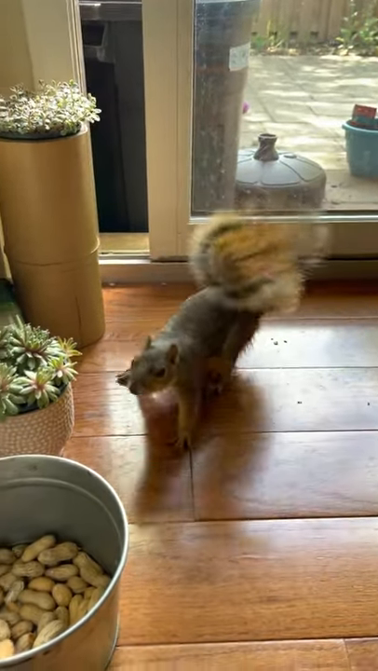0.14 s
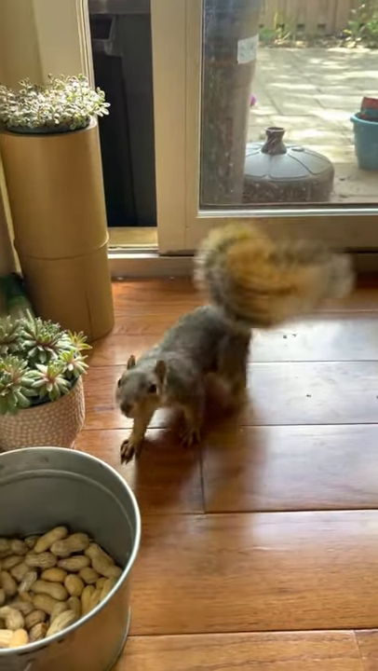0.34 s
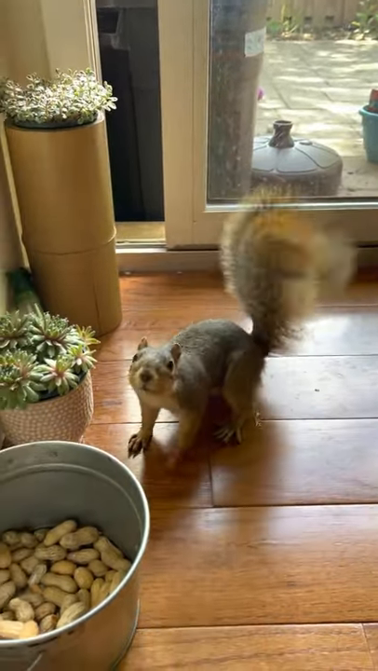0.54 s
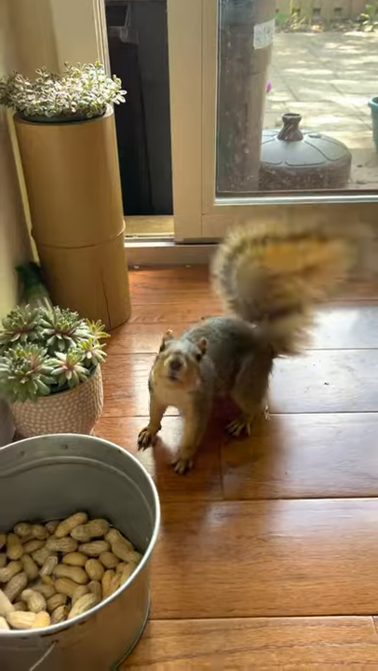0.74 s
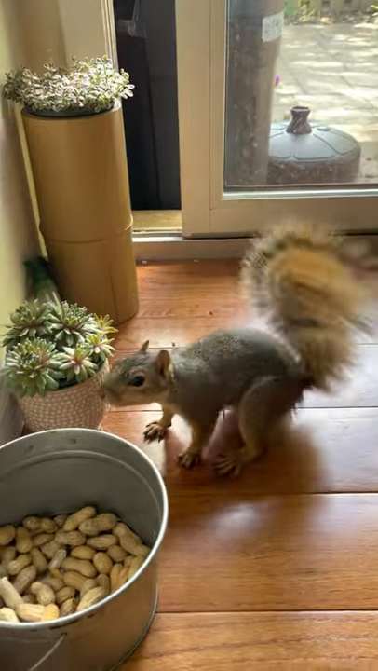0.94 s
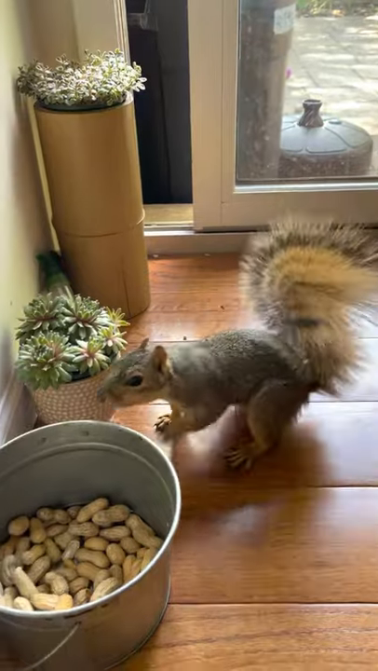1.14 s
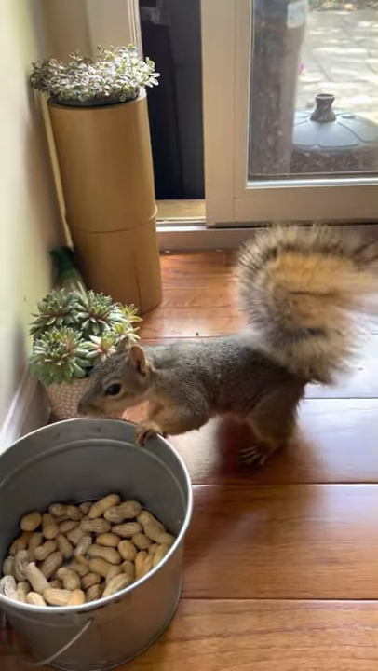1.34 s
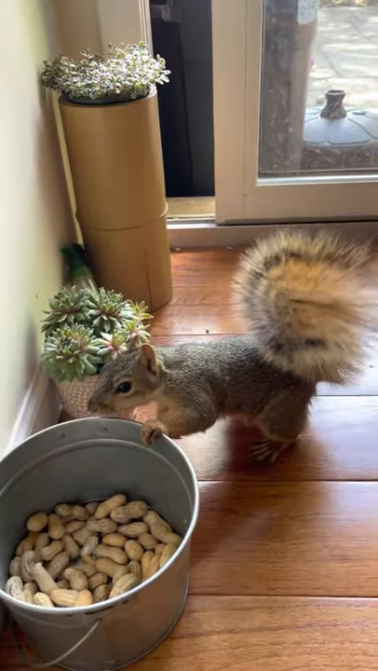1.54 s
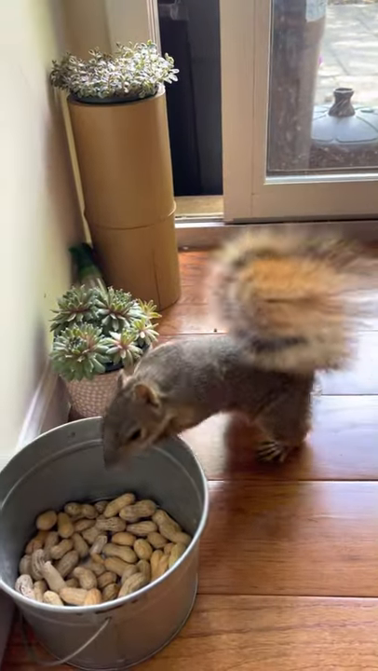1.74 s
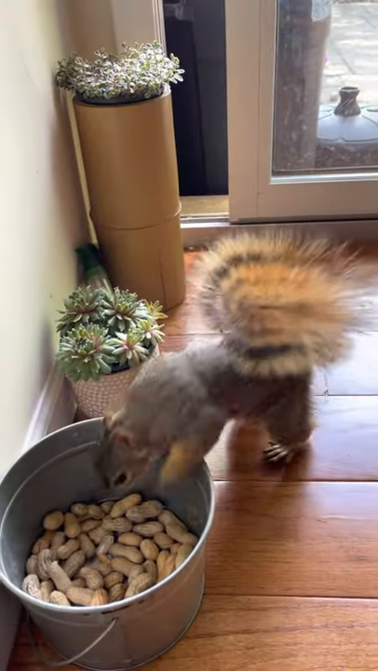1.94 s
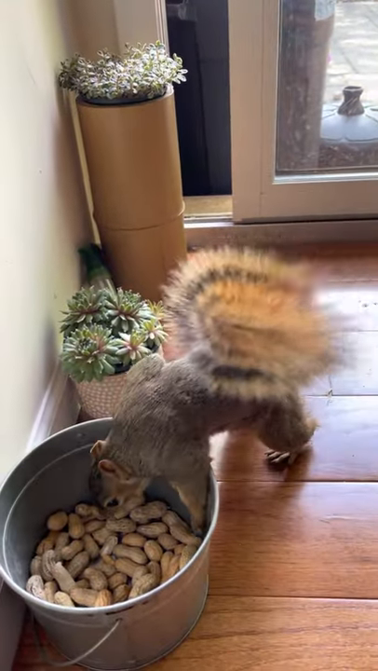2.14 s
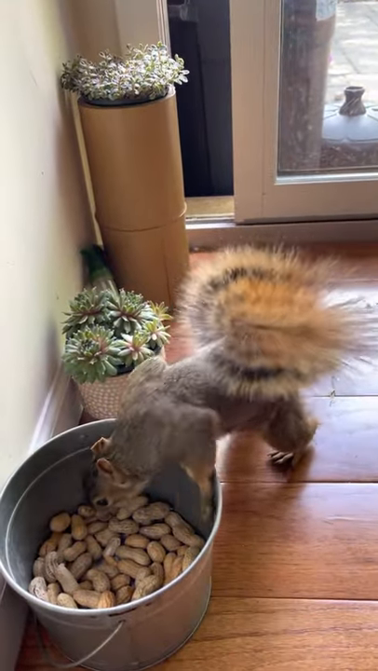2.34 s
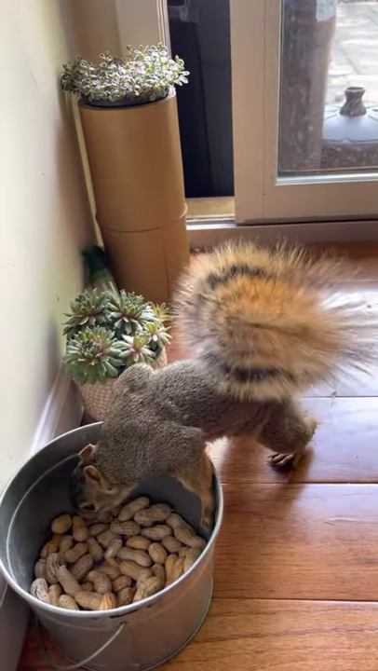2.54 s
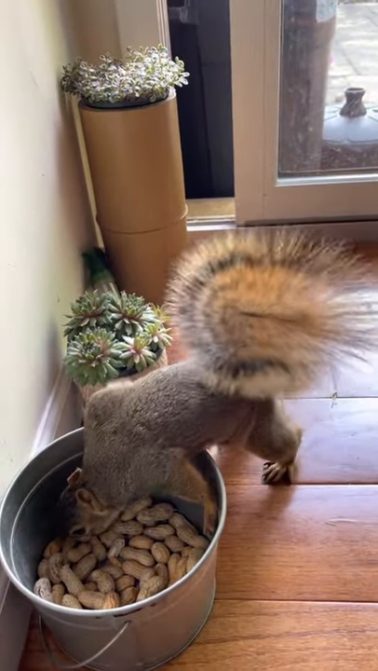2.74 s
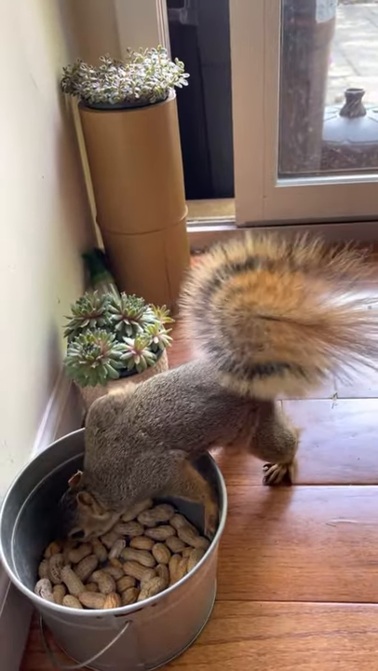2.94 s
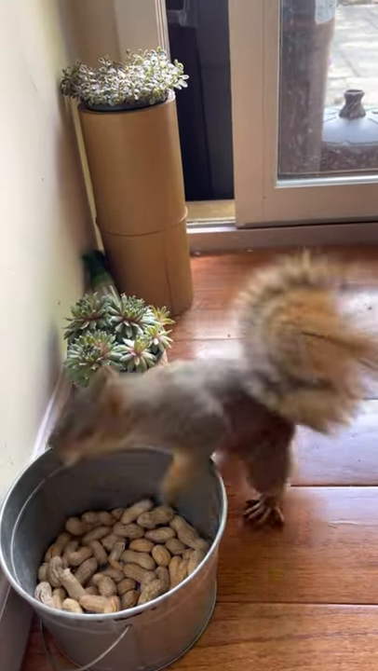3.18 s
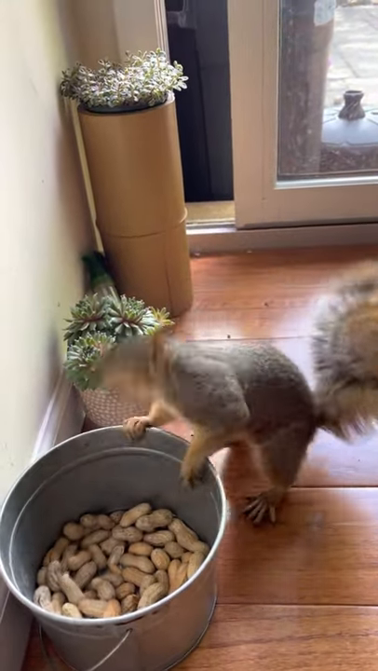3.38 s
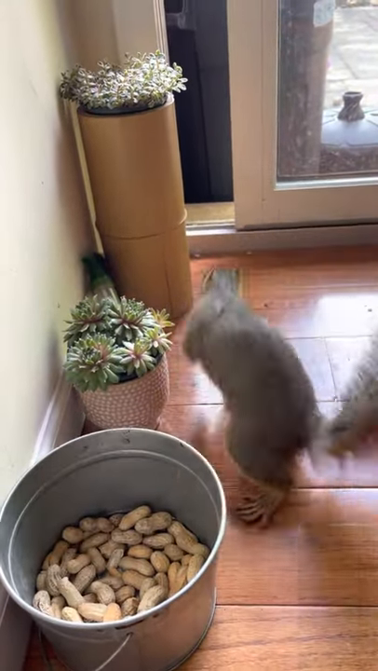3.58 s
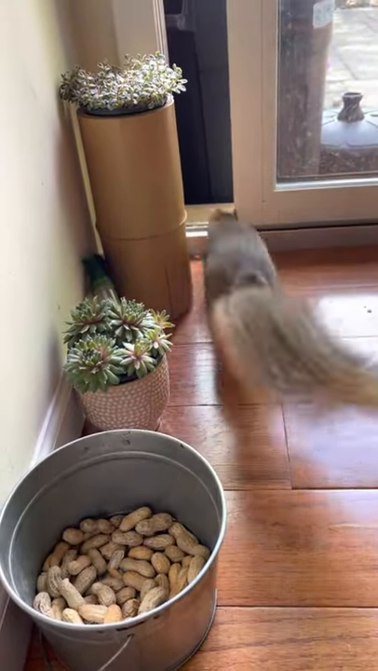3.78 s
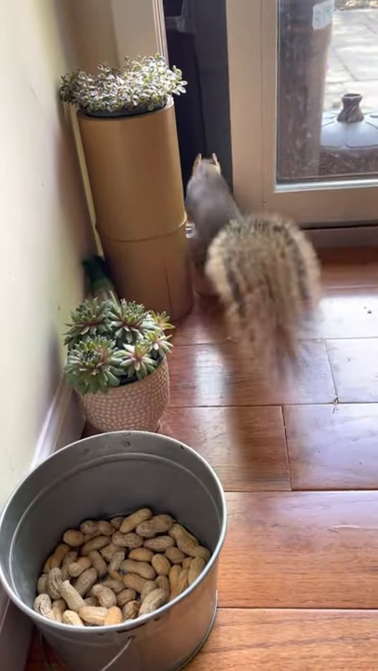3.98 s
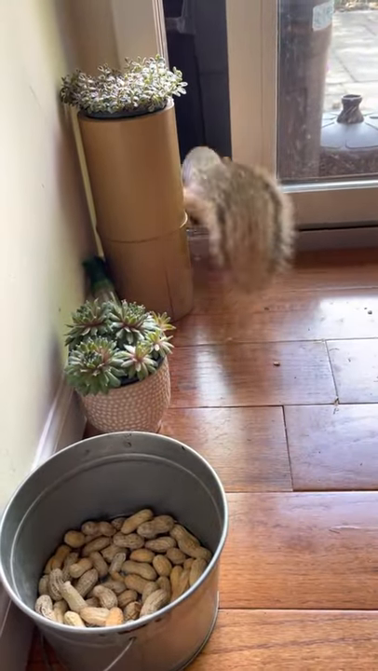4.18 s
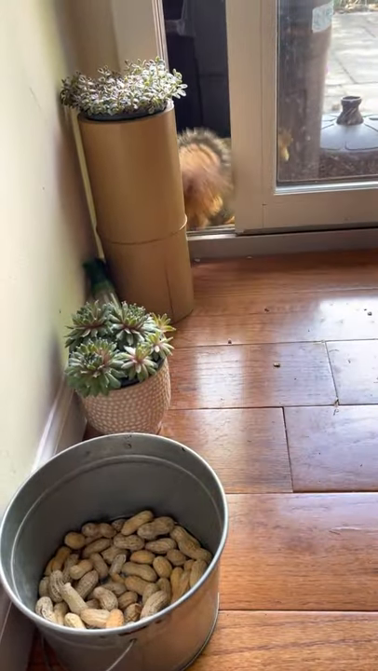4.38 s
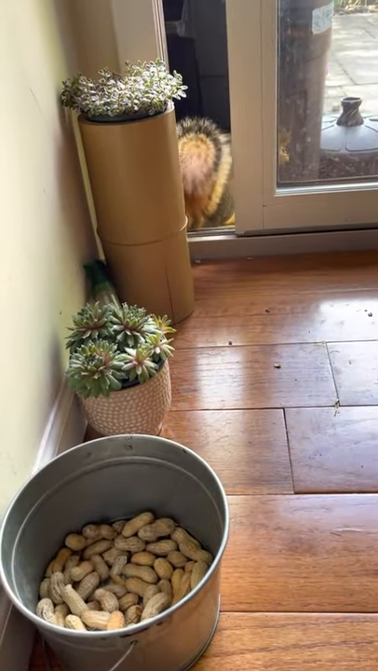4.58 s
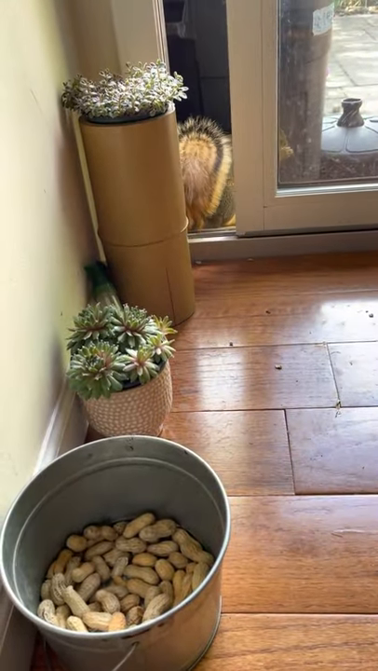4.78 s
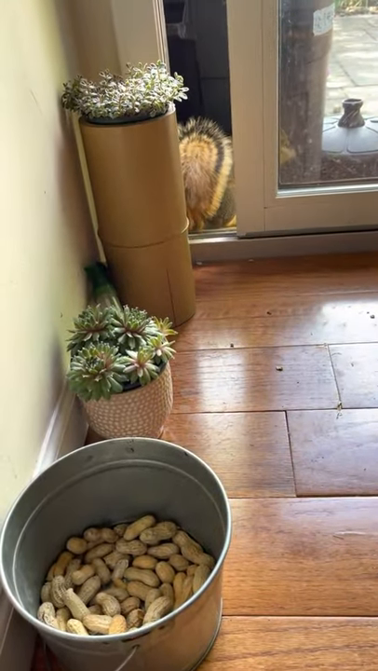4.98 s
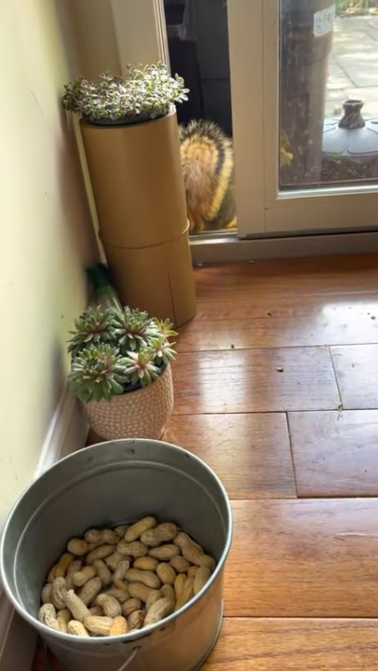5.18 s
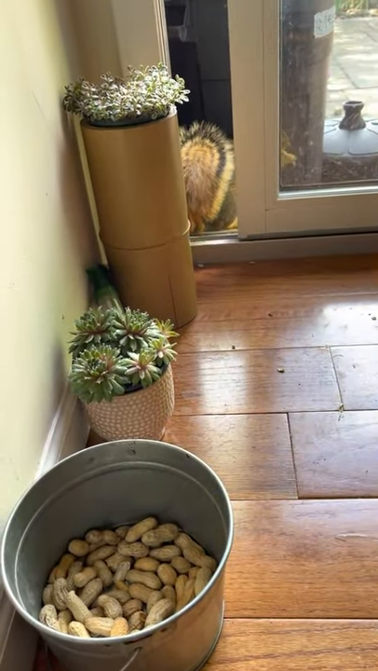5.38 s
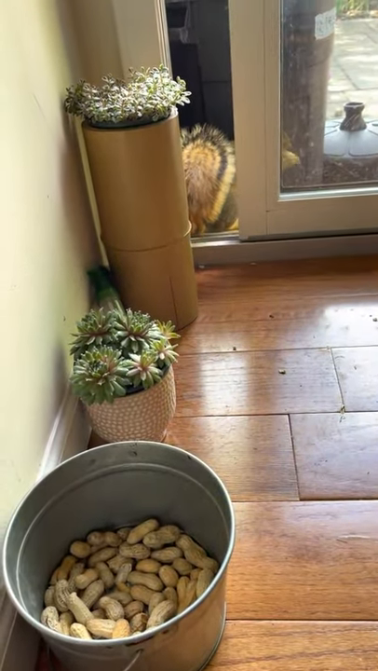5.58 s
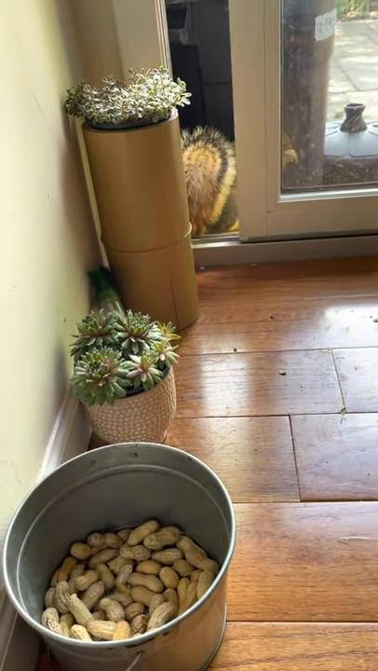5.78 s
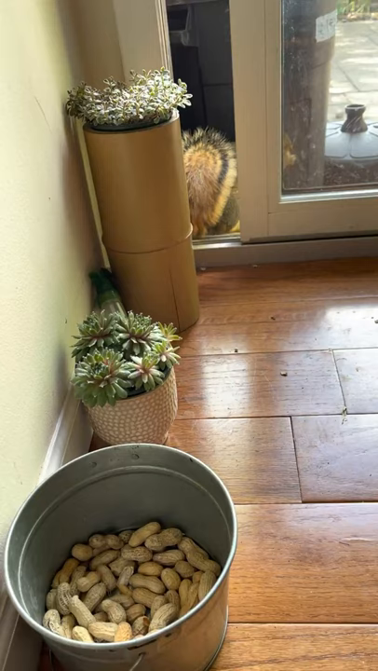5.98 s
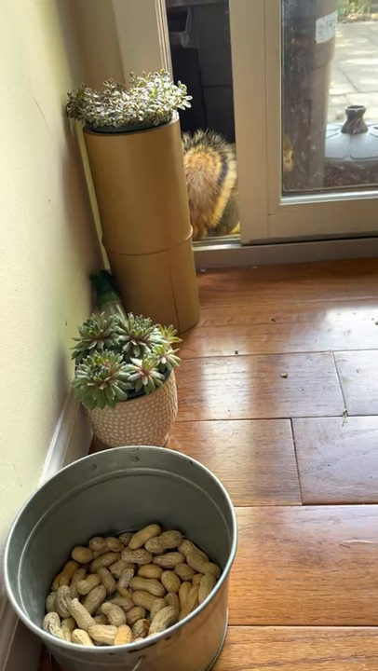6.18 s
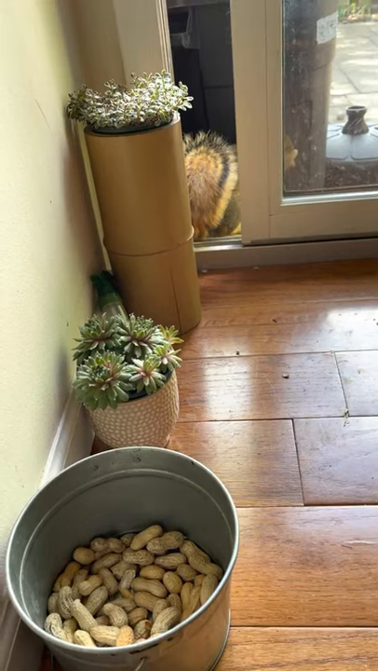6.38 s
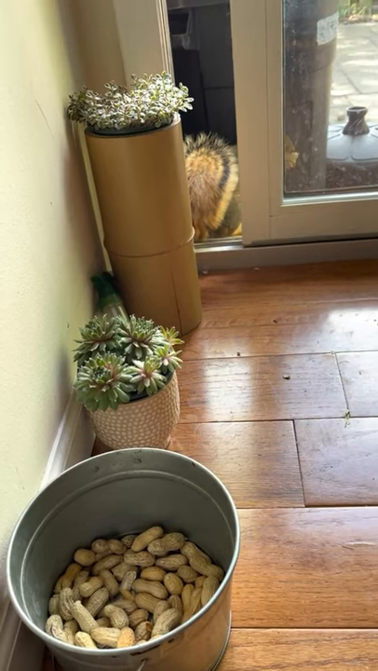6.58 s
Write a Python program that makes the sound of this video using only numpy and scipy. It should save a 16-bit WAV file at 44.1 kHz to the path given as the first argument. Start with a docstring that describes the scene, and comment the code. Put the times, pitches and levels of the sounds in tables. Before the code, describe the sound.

A squirrel pads across a hardwood floor with light claw clicks, then climbs a metal pail with a brief clank and scrape. Peanut shells rustle and crack as it rummages, and the pail's base knocks hollowly three times on the floor. The paws scamper away, leaving a faint appliance hum and very faint distant birds. Heard close up, in stereo, in a small room.

```python
"""A squirrel, close by in a small room, crosses a hardwood floor, climbs a metal pail and rummages
in the peanuts inside. Dry shells tick and scrape, the wall of the pail rings, and its base knocks three
times under the shifting weight; then the claws scamper off over the door sill. Behind it an appliance
hums faintly and far birds come in through the open door. Heard in stereo from two microphone ports."""
import sys
import numpy as np
from scipy import signal
from scipy.fft import rfft, irfft
from scipy.io import wavfile
from scipy.ndimage import uniform_filter1d

SR = 44100
rng = np.random.default_rng(int(sys.argv[2]) if len(sys.argv) > 2 else 0)


def to_wav(sig):
    """Store sig (one row per channel, or 1-D mono) as 16-bit WAV at the path in sys.argv[1].

    Samples outside -1..1 are clipped; the rate is SR.
    """
    pcm = np.clip(np.atleast_2d(sig), -1, 1) * 32767
    pcm = np.round(pcm).astype(np.int16)
    wavfile.write(sys.argv[1], SR, pcm.T)  # frames by channels


N = 291942
T = np.arange(N) / SR
HIT_N = SR // 2  # samples given to one short event
HIT_T = T[:HIT_N]

# paws landing on the floor and the pail, each a soft tap with a claw click:
# start_s, tap_peak_db, claw_peak_db
FOOTFALLS = [(.067, -49, -57), (0.188, -53.5, -63), (.259, -48.5, -62), (.377, -48.5, -66),
             (0.492, -42.5, -55.5), (.986, -44, -55.5), (1.019, -42.5, -52), (1.3196, -30.5, -45.5),
             (1.461, -43.5, -41), (2.902, -38.5, -43.5), (3.636, -35, -60), (3.776, -42.5, -61),
             (3.882, -49, -66), (3.946, -42, -50.5), (4.409, -36, -40)]
# resonances of the pail's wall: pitch_hz, level_db, t60_s
WALL_MODES = [(297, 0, 0.049), (359.7, -12, 0.17), (430, 2.5, 0.041), (588, -11.5, 0.043),
              (714.7, -2, 0.083), (838, -2, 0.078), (1156, -3, 0.0565), (1230, -16, 0.065),
              (1632, -13, .13), (1809, -6, 0.11), (2130, -8.5, .1), (2173, -14.5, 0.089),
              (2340, -8.5, 0.072), (2462, -6.5, 0.18), (2640, -12, 0.089), (2300, -10.5, .11),
              (2716, -8.5, 0.13), (3110, -13, 0.078), (3363, -16.5, 0.17), (3623, -27, .08)]
# spectrum of sliding shells: frequency_hz, gain_db
SHELL_SPECTRUM = [(300, -23.5), (1000, -5.5), (1600, -8), (2600, -9.5), (3600, -6.5), (5300, -9),
                  (7000, 0.5), (9800, 3.5), (11400, 1), (12400, -12), (13500, -40)]


def undb(db):
    """Decibels to gain."""
    return 10 ** (np.asarray(db) / 20)


def along(points, size):
    """A curve over log frequency, read at the FFT bins of a sound of this size."""
    hz, value = np.transpose(points)
    bin_hz = np.arange(size // 2 + 1) * SR / size
    return np.interp(np.log(bin_hz + 1), np.log(hz), value)


def colour(x, points):
    """Minimum-phase filter through the points: frequency_hz, gain_db."""
    size = len(x)
    cepstrum = irfft(np.log(undb(along(points, size))), size)
    cepstrum[1:size // 2] *= 2
    cepstrum[size // 2 + 1:] = 0
    return irfft(rfft(x) * np.exp(rfft(cepstrum)), size)


def brighten(x, db):
    """Favour the treble by turning the lows and middle down by db."""
    return colour(x, [(2200, -db), (7000, 0.01)])


def peak(x, db):
    """Scale to a peak level."""
    return x * undb(db) / np.abs(x).max()


def add(track, start_s, x):
    """Mix a sound in at a time."""
    start = int(start_s * SR)
    track[start:start + len(x)] += x[:N - start]


def swell(rise_s):
    """Contact builds up over a moment."""
    return 1 - np.exp(-HIT_T / rise_s)


def fade(t60):
    """A hit dies away by 60 dB in t60 seconds."""
    return np.exp(-np.log(1000) * HIT_T / t60)


def stroke(length_s):
    """A push builds quickly, holds and lets go."""
    return np.sqrt(np.abs(np.sin(np.pi * np.minimum(HIT_T / length_s, 1))))


def mode(hz, t60, delay_s=0):
    """One struck resonance."""
    t = np.maximum(HIT_T - delay_s, 0)
    return np.sin(2 * np.pi * hz * t) * np.exp(-np.log(1000) * t / t60)


def wander(rate_hz, size=HIT_N):
    """Random values joined by straight lines."""
    hold = int(SR / rate_hz)
    held = np.repeat(rng.standard_normal(size // hold + 1), hold)
    return uniform_filter1d(held, hold)[:size]


def grains(per_s, scatter_db, size=HIT_N):
    """Tiny fractures and slips of uneven strength at random moments."""
    slips = (rng.random(size) < per_s / SR) * rng.standard_normal(size)
    slips *= undb(scatter_db * np.minimum(rng.exponential(size=size), 4))
    return slips / slips.std()


def hollow(x, ring_db=-8, count=28):
    """Every shell has its own few short, high resonances."""
    ring = sum(rng.standard_normal() * mode(hz, t60=.008) for hz in rng.uniform(2500, 11000, count))
    return x + undb(ring_db) * signal.fftconvolve(x, ring / np.linalg.norm(ring))[:len(x)]


def whistles(notes, fall, warble, gain_db):
    """Short wavering tones; fall and warble are shares of the pitch."""
    out = np.zeros(N)
    for start_s, length_s, start_hz, db in notes:
        progress = np.minimum(HIT_T / length_s, 1)
        hz = start_hz * (1 - fall * progress) * (1 + warble * wander(600))
        tone = np.sin(2 * np.pi * np.cumsum(hz) / SR)
        add(out, start_s, undb(db + gain_db) * np.sin(np.pi * progress) * tone)
    return out


def diffuse(mid, side):
    """Left and right of a sound that reaches the microphones from all around."""
    # stereo width of diffuse sound: frequency_hz, side_gain_db
    width = [(60, -57), (120, -45), (200, -22.5), (360, -3.5), (700, -3), (1300, -3.5), (3000, -3.5),
             (8000, -9)]
    side = colour(side, width)
    return np.array([mid + side, mid - side])


def room_tone(air_db=-47.5, hum_gain_db=-1, waver_db=2.5, drift_rad=0.072):
    """An appliance hums and wavers over the low rush of moving air."""
    # spectrum of the room's air: frequency_hz, gain_db
    air_spectrum = [(22, -57), (40, -7.5), (55, -4.5), (78, 1.5), (110, 0), (165, -11.5), (230, -10.5),
                    (310, -20), (500, -22.5), (820, -28), (1200, -38), (1750, -39), (2300, -49),
                    (4200, -55.5), (6000, -58.5), (11500, -56.5), (13500, -80)]
    # partials of the appliance: pitch_hz, relative_db
    partials = [(118.4, -56), (355.3, -61), (473.7, -73.5), (532.9, -71), (646.0, -77), (775.2, -69.5)]
    mid, side = (colour(rng.standard_normal(N), air_spectrum) for _ in range(2))
    air = diffuse(mid, side) / mid.std() * undb(air_db)
    hum = np.zeros(N)
    for hz, db in partials:
        amplitude = np.sqrt(2) * undb(db + hum_gain_db + waver_db * wander(8.6, N))
        hum += amplitude * np.sin(2 * np.pi * hz * T + drift_rad * wander(3.7, N))
    return air + hum


def paws(tap_hz=922, pitch_spread=0.068, tone_gain_db=-3):
    """Each soft paw excites dense, damped modes, one standing out; heavy landings move the boards."""
    # the body's weight on the boards: start_s, peak_db, pitch_hz
    thumps = [(0.991, -30.5, 123.5), (1.319, -37.5, 120), (1.467, -42, 441), (3.637, -37, 319),
              (3.779, -44.5, 362), (3.946, -46, 331)]
    # spectrum of a tap: frequency_hz, gain_db
    tap_spectrum = [(120, -16), (300, -1), (450, 0), (tap_hz, -3), (tap_hz, 1), (1.24 * tap_hz, -7),
                    (2200, -16), (3500, -27), (7000, -42), (14000, -70)]
    out = np.zeros(N)
    onset = swell(rise_s=0.0012)
    for start_s, db, _ in FOOTFALLS:
        tap = colour(rng.standard_normal(HIT_N) * onset * fade(t60=0.05), tap_spectrum)
        tone_hz = tap_hz * (1 + pitch_spread * rng.standard_normal())
        tone = mode(tone_hz, t60=0.024) * onset
        add(out, start_s, peak(tap, db) + peak(tone, db + tone_gain_db))
    for start_s, db, hz in thumps:
        add(out, start_s, peak(mode(hz, t60=0.1) * onset, db))
    return out


def ticks(snap=2.67, full_splinter_db=-35, nibble_db=-57.5, nibble_bright_db=-31):
    """Shells, claws and teeth make a sharp snap; the harder ones are followed by more splintering."""
    # shells cracking and single claws catching: start_s, peak_db, brightness_db
    cracks = [(0.512, -49, -12), (0.6086, -54.5, -10), (1.1898, -56.5, -17), (1.37, -28.5, -3),
              (1.4727, -34.5, 3), (2.128, -31, -13.5), (2.4195, -17.5, 4), (2.43, -32, -14),
              (2.9396, -40.5, -20.5), (3.061, -38, -21), (3.078, -32.5, -23), (3.1665, -32, -24.5),
              (3.832, -53.5, -22), (3.904, -50.5, -16), (3.9694, -51, -24), (4.2023, -55.5, -16),
              (4.272, -49.5, -26), (4.361, -28, -5.5)]
    # claws graze in the walk and dig in, duller, in the run: time_s, brightness_db
    claw_brightness = [(1.0, 10), (3.8, -14)]
    # faint, dull nibbles from beyond the door: start_s
    nibble_times = [4.753, 5.02, 6.121, 6.184]
    # spectrum of a dry click: frequency_hz, gain_db
    click_spectrum = [(300, -33), (1200, -12), (2400, -12.5), (3300, -5.5), (4200, -6), (5300, -4),
                      (7000, 3.5), (10000, 6.5), (11500, 2), (12700, -9), (14000, -42.5)]
    claws = [(s, db, np.interp(s, *np.transpose(claw_brightness))) for s, _, db in FOOTFALLS]
    nibbles = [(s, nibble_db, nibble_bright_db) for s in nibble_times]
    out = np.zeros(N)
    for start_s, db, bright_db in cracks + claws + nibbles:
        splinter = min(undb((db - full_splinter_db) / 3), 1)
        crack = splinter * grains(per_s=11370, scatter_db=1.2) * swell(rise_s=0.0011) * fade(t60=0.061)
        crack[0] += snap
        click = colour(hollow(crack), click_spectrum)
        add(out, start_s, peak(brighten(click, bright_db), db))
    return out


def scrapes(rib_hz=250, rib_db=3, neutral_db=-55, brightness_per_db=0.37):
    """Ribbed shells catch and slip on each other in short, uneven strokes, brighter when pushed harder."""
    # pushes that make shells and claws slide: start_s, length_s, level_db
    pushes = [(0.529, 0.032, -64.5), (1.781, 0.026, -63), (1.847, 0.029, -58.5), (1.976, 0.035, -58.5),
              (2.031, 0.1, -56.5), (2.128, .11, -48.5), (2.427, 0.069, -48.5), (2.508, 0.048, -43),
              (2.642, 0.11, -53), (2.704, 0.065, -39), (2.901, 0.042, -61.5), (3.075, 0.14, -45),
              (3.43, 0.088, -48.5), (3.511, 0.075, -50)]
    out = np.zeros(N)
    for start_s, length_s, db in pushes:
        slips = undb(rib_db * wander(rib_hz)) * grains(per_s=3000, scatter_db=-0.9)
        rasp = colour(hollow(slips), SHELL_SPECTRUM)
        rasp = brighten(rasp, brightness_per_db * (db - neutral_db))
        add(out, start_s, rasp / rasp.std() * stroke(length_s) * undb(db))
    return out


def birds():
    """Birds far out in the yard whistle short, sinking notes."""
    # calls: start_s, length_s, start_hz, relative_db
    calls = [(1.098, 0.12, 3870, -85), (4.52, 0.067, 3600, -76.5), (4.915, 0.09, 3250, -86),
             (5.44, 0.19, 3205, -78.5), (5.476, 0.23, 4340, -84.5), (5.81, .2, 3490, -85.5),
             (6.1, .06, 3550, -78.5), (6.24, 0.12, 4200, -80.5)]
    return whistles(calls, fall=0.13, warble=0.07, gain_db=-1)


def wall_clanks(spread_db=2, rattle=0.078):
    """Each blow rattles against the pail's thin wall at another spot, and so weights its modes anew."""
    # paws and nuts striking the wall: start_s, peak_db, tilt_db_per_octave
    blows = [(1.3709, -28.5, -9), (1.4654, -33, -11), (2.1306, -35.5, 4), (2.142, -37, 3), (2.161, -44, 1),
             (2.421, -41.5, 2), (2.4294, -26, -2.5), (2.942, -55, -5), (3.162, -38, -8), (4.361, -47, 1.5)]
    out = np.zeros(N)
    count = len(WALL_MODES)
    for start_s, db, tilt_db in blows:
        weights = undb(spread_db * rng.standard_normal(count)) * rng.choice([-1, 1], count)
        ring = sum(weight * undb(mode_db + tilt_db * np.log2(hz / 1000)) * mode(hz, t60)
                   for weight, (hz, mode_db, t60) in zip(weights, WALL_MODES))
        contact = rattle * grains(per_s=2000, scatter_db=0.85) * fade(t60=0.0404)
        contact[0] += 1
        add(out, start_s, peak(signal.fftconvolve(ring, contact), db))
    return out


def rim_skid(bright_db=7, ring_db=-44):
    """Claws skid on the pail's rim with a thin hiss and keep the wall ringing."""
    # the slide along the metal: start_s, length_s, level_db
    slide = (1.4, 0.14, -55)
    start_s, length_s, db = slide
    slips = grains(per_s=6000, scatter_db=.6) * undb(2 * wander(250)) * stroke(length_s)
    hiss = brighten(colour(hollow(slips), SHELL_SPECTRUM), bright_db)
    hiss = signal.lfilter(*signal.butter(4, 10500, fs=SR), hiss)
    wall = sum(undb(mode_db) * mode(hz, t60) for hz, mode_db, t60 in WALL_MODES)
    ring = signal.lfilter(*signal.butter(3, [400, 820], "band", fs=SR), signal.fftconvolve(slips, wall))
    out = np.zeros(N)
    add(out, start_s, hiss / hiss[HIT_T < length_s].std() * undb(db))
    add(out, start_s, peak(ring, ring_db))
    return out


def stirring_nuts(uneven_db=5.5, bright_db=-7):
    """Loose nuts shift under the squirrel with a soft, dull rustle."""
    # course of the rustle: time_s, level_db
    levels = [(1.75, -85), (1.95, -69.5), (2.28, -77), (2.39, -72.5), (2.6, -71.5), (2.8, -59),
              (3.02, -72.5), (3.1, -45.5), (3.3, -63), (3.42, -66.5), (3.6, -68.5), (3.7, -101)]
    slips = grains(per_s=2500, scatter_db=-0.5, size=N)
    rustle = brighten(colour(slips, SHELL_SPECTRUM), bright_db)
    db = np.interp(T, *np.transpose(levels), left=-np.inf, right=-np.inf)
    return rustle / rustle.std() * undb(db + uneven_db * wander(40, N))


def pail_knocks(travel_at_1khz_s=0.00257, radiate_hz=412, jostle=0.014):
    """The pail tips and lands: a soft blow rings its base, which is too small to radiate bass."""
    # landings on the floor, harder with a higher cut-off: start_s, peak_db, cutoff_hz
    landings = [(2.7643, -12.5, 676), (3.086, -14.5, 597), (3.1955, -7.5, 950)]
    # resonances of the base, with a low thump of the floor beneath it at about 150 Hz: pitch_hz, level_db,
    # t60_s
    knock_modes = [(147.5, -8.5, 0.3), (294, 2.9, 0.078), (328, -0.3, 0.05), (350.6, -9, 0.16),
                   (361.7, -18, 0.38), (674, -15, 0.053), (734.5, 6, 0.021), (787, -17, 0.098),
                   (804, -35, 0.55), (1074, -14, 0.023), (1172, -22, 0.1), (1354, -12.5, 0.04),
                   (1943, -9.5, 0.027), (2340, -16.5, 0.082), (2650, -16, 0.072)]
    # bending waves travel slower at low pitch, so each knock falls from high to low
    ring = sum(undb(db) * mode(hz, t60, delay_s=travel_at_1khz_s * np.sqrt(1000 / hz))
               for hz, db, t60 in knock_modes)
    ring = signal.lfilter(*signal.butter(2, radiate_hz, "high", fs=SR), ring)
    out = np.zeros(N)
    for start_s, db, cutoff_hz in landings:
        # the nuts jump and settle on the base, differently each time
        blow = jostle * grains(per_s=1300, scatter_db=1.1) * swell(rise_s=.01) * fade(t60=0.095)
        blow[0] += 1
        blow = signal.lfilter(*signal.butter(2, cutoff_hz, fs=SR), blow)
        add(out, start_s, peak(signal.fftconvolve(ring, blow), db))
    return out


def shell_squeaks():
    """A shell sticks and gives a tiny, high squeak."""
    # squeaks: start_s, length_s, pitch_hz, relative_db
    squeaks = [(3.165, 0.0095, 7650, -28), (3.522, 0.021, 4670, -41.5), (3.555, 0.019, 8370, -44)]
    return whistles(squeaks, fall=0, warble=0.012, gain_db=-10)


def room(x, wet_db, onset_s=0.0017):
    """Direct sound, echoes from the near wall and the glass door, and a short diffuse tail."""
    # reverberation time: frequency_hz, t60_s
    decay_times = [(150, .42), (700, .42), (2500, .37), (7000, .3), (12000, .26)]
    # early echoes: delay_s, gain_db
    echoes = [(0.0114, -18), (0.0132, -14.5)]
    edges_hz = np.geomspace(100, 16000, num=9)
    tail = np.zeros((2, HIT_N))
    for low, high in zip(edges_hz, edges_hz[1:]):
        bandpass = signal.butter(3, [low, high], "band", fs=SR, output="sos")
        t60 = np.interp(np.sqrt(low * high), *np.transpose(decay_times))
        tail += signal.sosfilt(bandpass, rng.standard_normal((2, HIT_N))) * fade(t60)
    tail *= np.minimum(HIT_T / onset_s, 1) ** 2
    response = diffuse(*tail) * undb(wet_db) / np.linalg.norm(tail[0])
    response[:, 0] += 1
    for delay_s, db in echoes:
        response[:, int(delay_s * SR)] += undb(db)
    return signal.fftconvolve(x[None], response, axes=1)[:, :N]


def scene():
    """The squirrel and pail are near and mostly direct; the far birds carry much more of the room."""
    shells = ticks() + scrapes() + rim_skid() + stirring_nuts() + shell_squeaks()
    yard = birds()
    near = room(pail_knocks(), wet_db=-13.5)
    near += room(paws() + wall_clanks(), wet_db=-10)
    near += room(shells, wet_db=-8)
    return near + room(yard, wet_db=1.5) + room_tone()


def record(dry, top_hz=13900):
    """The two microphone ports differ in phase in the treble; the top is cut."""
    # phase of the left port against the right: frequency_hz, lead_rad
    port_phase = [(700, 0), (2200, -.45), (3200, 0), (4900, 0), (5700, -1.6), (8000, -1.9), (12000, -2.15)]
    half_lead = np.exp(.5j * along(port_phase, N))
    ports = irfft(rfft(dry) * np.array([half_lead, half_lead.conj()]), N)
    return signal.sosfilt(signal.ellip(8, .2, 70, top_hz, fs=SR, output="sos"), ports)


dry = scene()
out = record(dry)
to_wav(out)
```